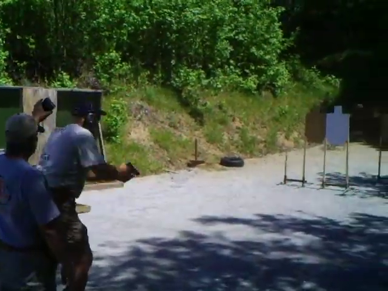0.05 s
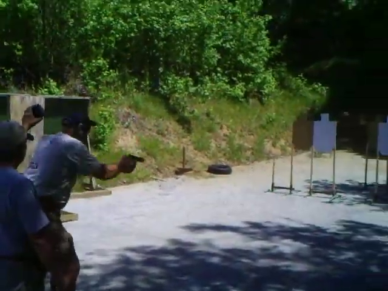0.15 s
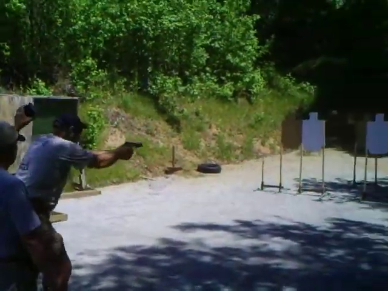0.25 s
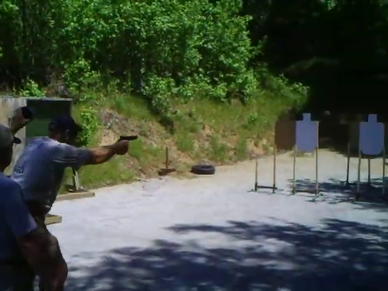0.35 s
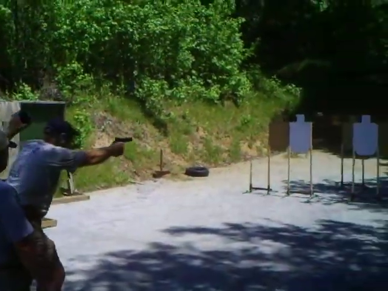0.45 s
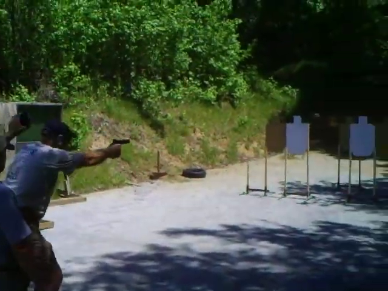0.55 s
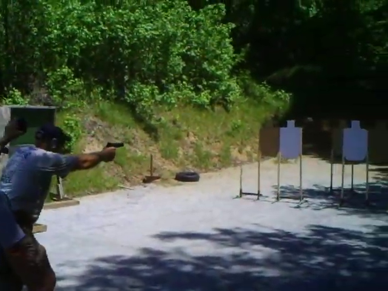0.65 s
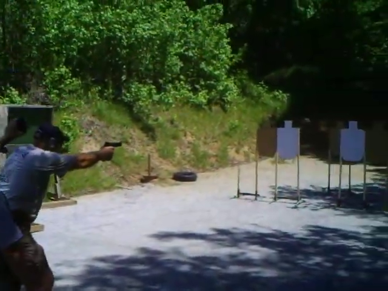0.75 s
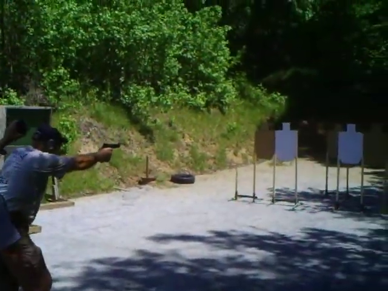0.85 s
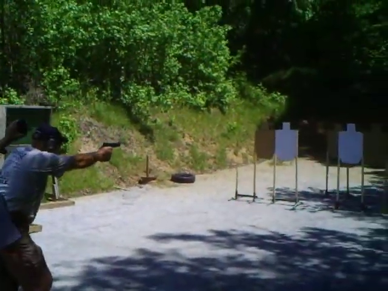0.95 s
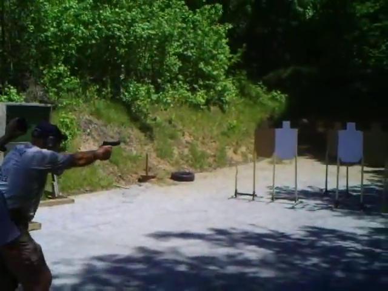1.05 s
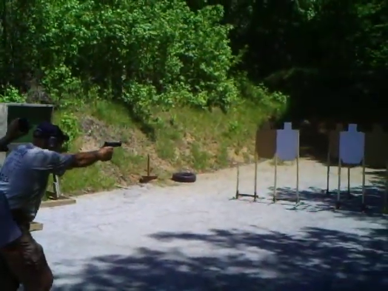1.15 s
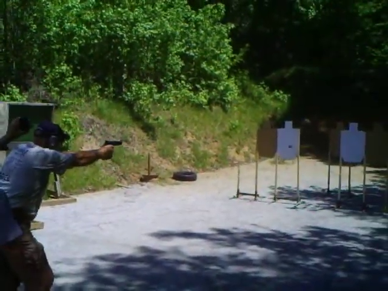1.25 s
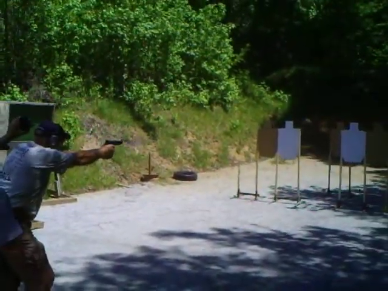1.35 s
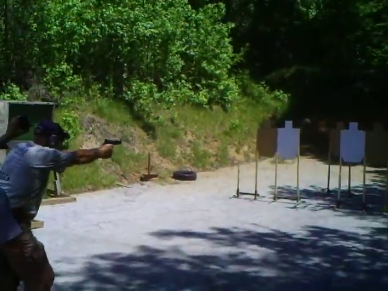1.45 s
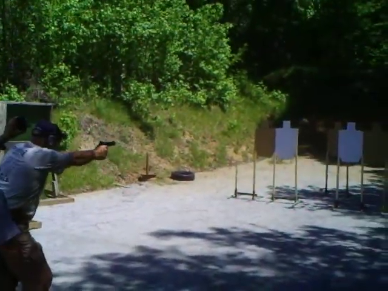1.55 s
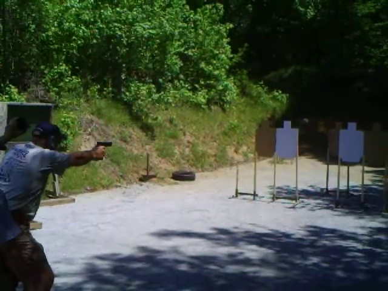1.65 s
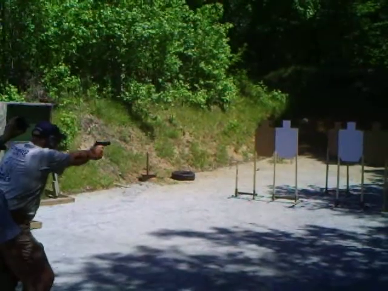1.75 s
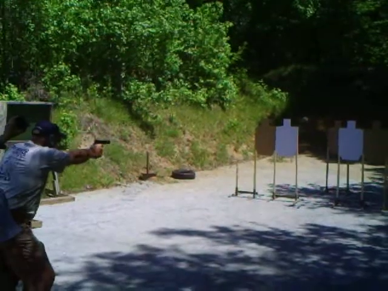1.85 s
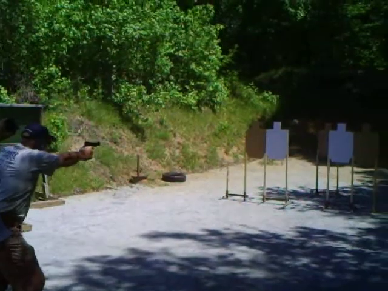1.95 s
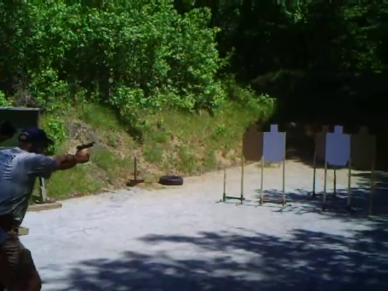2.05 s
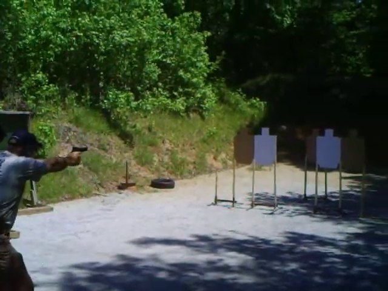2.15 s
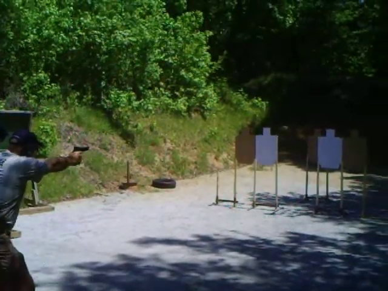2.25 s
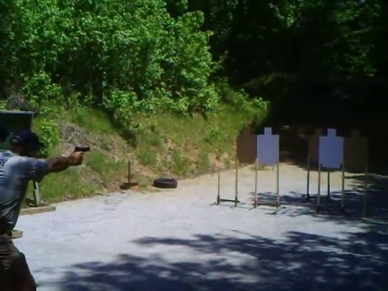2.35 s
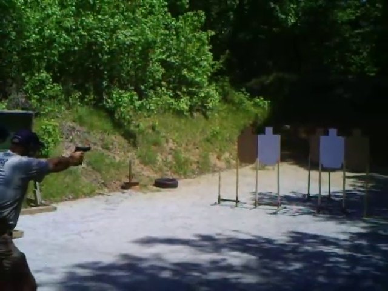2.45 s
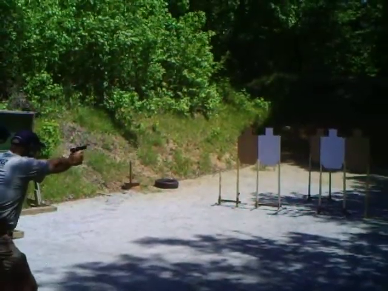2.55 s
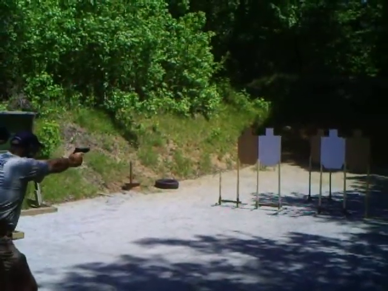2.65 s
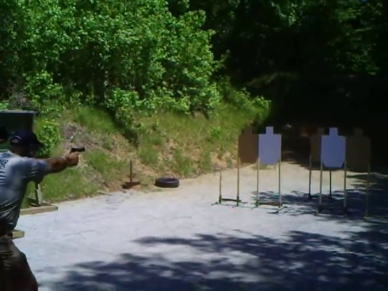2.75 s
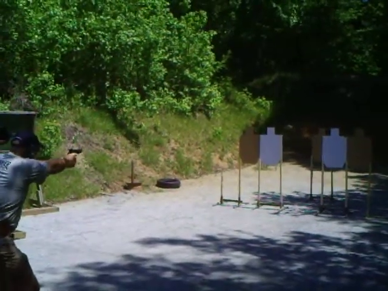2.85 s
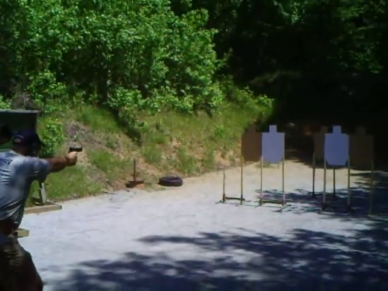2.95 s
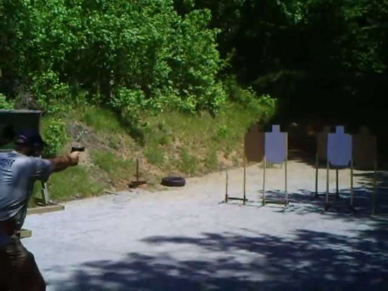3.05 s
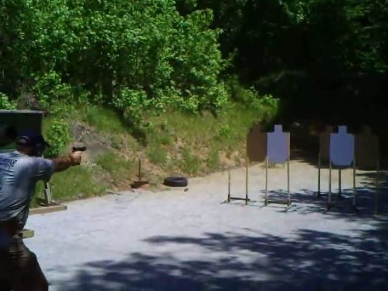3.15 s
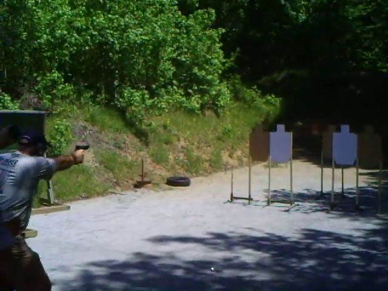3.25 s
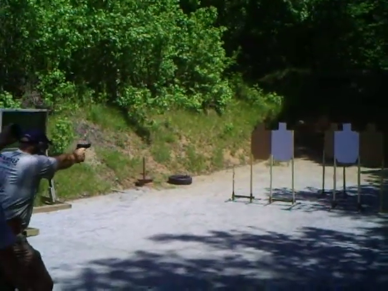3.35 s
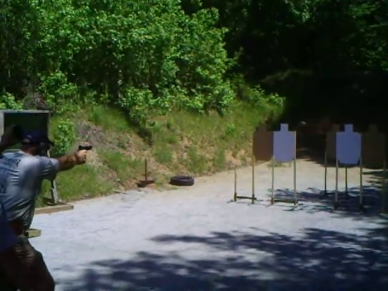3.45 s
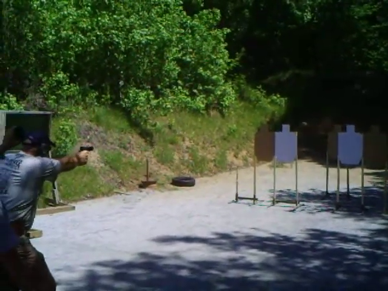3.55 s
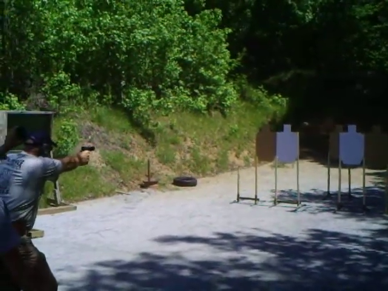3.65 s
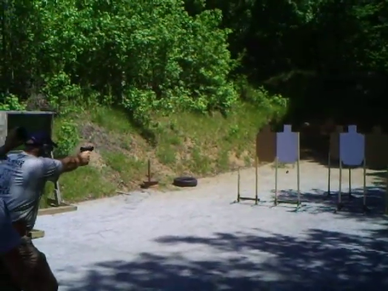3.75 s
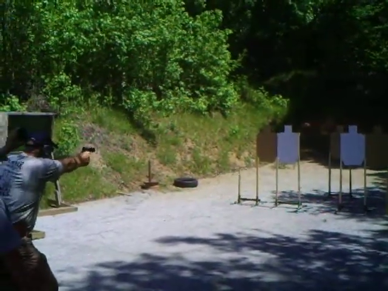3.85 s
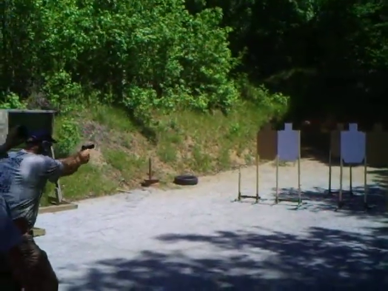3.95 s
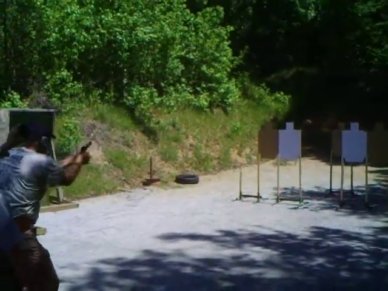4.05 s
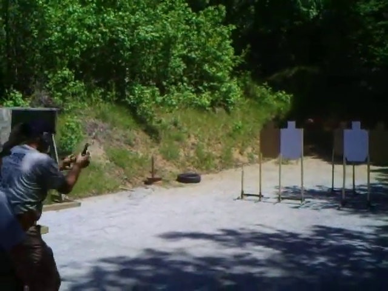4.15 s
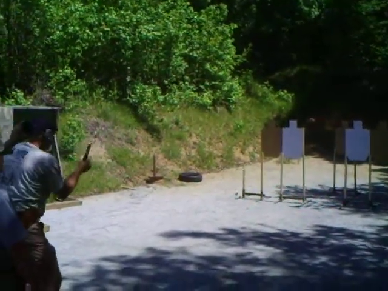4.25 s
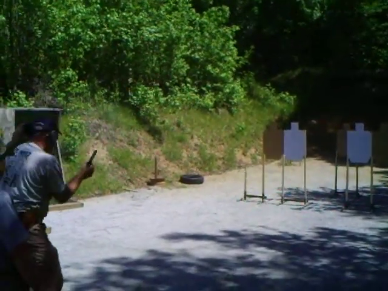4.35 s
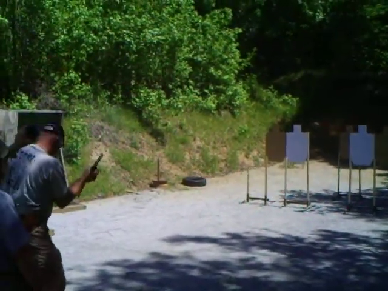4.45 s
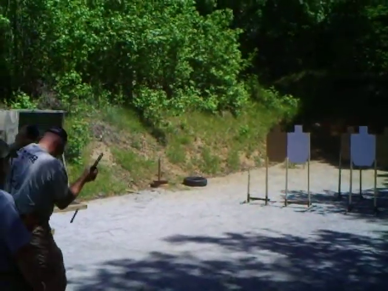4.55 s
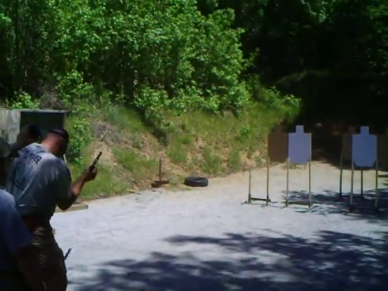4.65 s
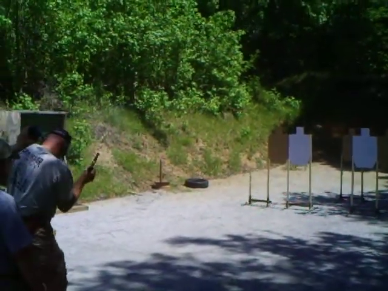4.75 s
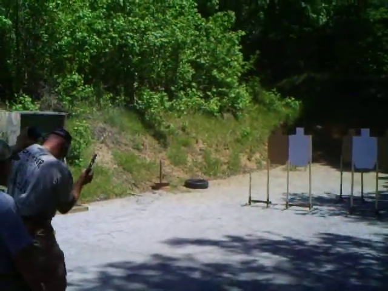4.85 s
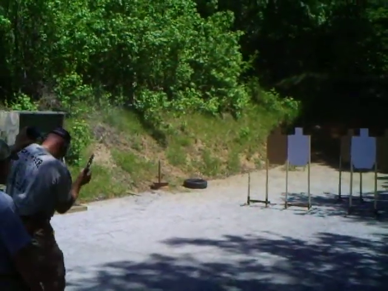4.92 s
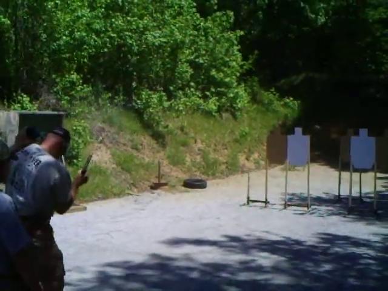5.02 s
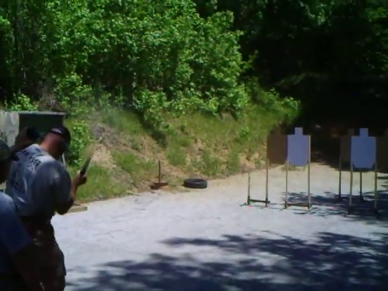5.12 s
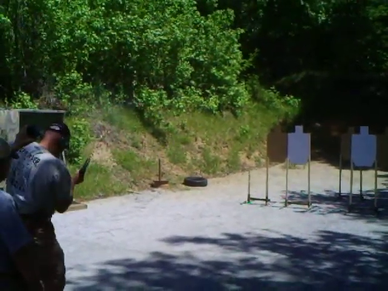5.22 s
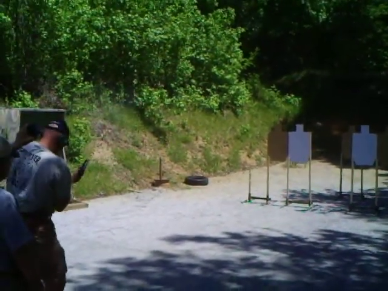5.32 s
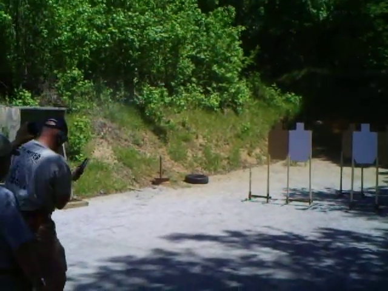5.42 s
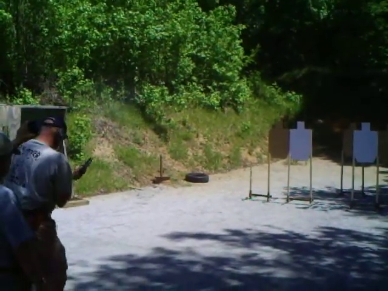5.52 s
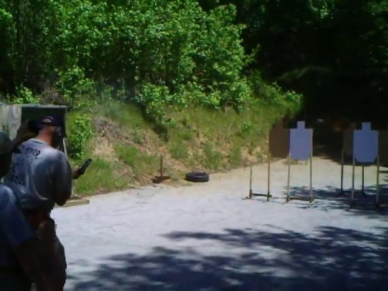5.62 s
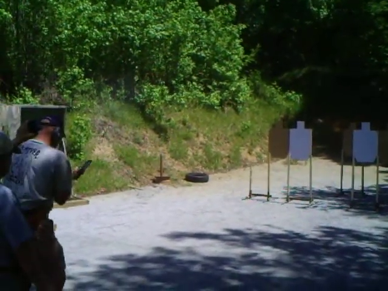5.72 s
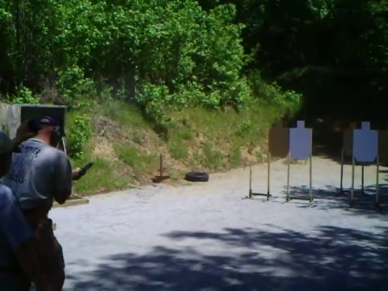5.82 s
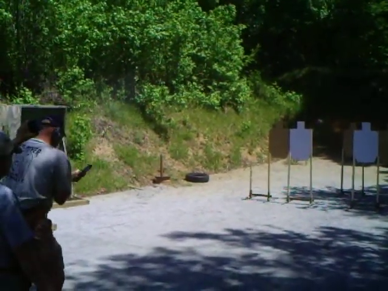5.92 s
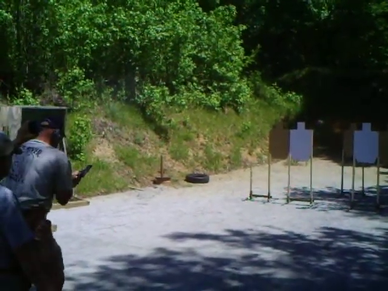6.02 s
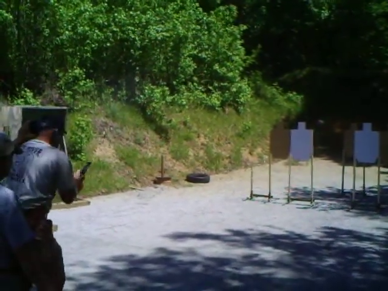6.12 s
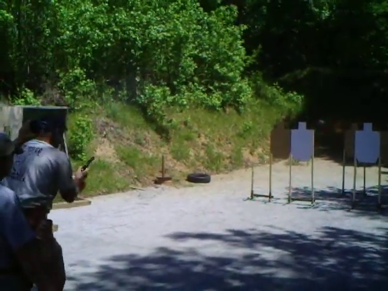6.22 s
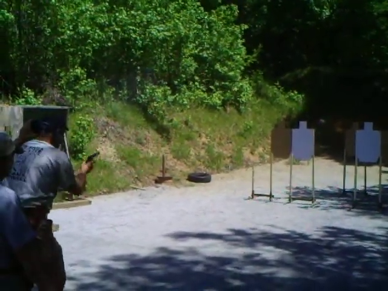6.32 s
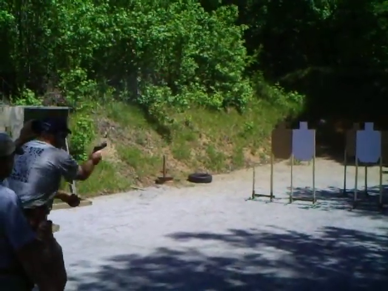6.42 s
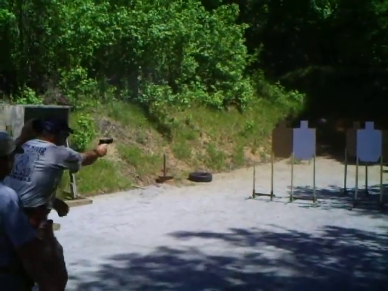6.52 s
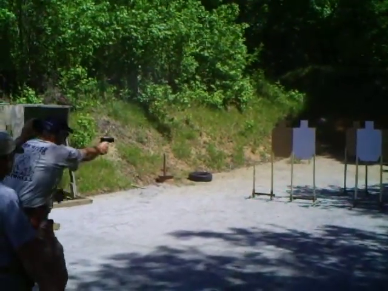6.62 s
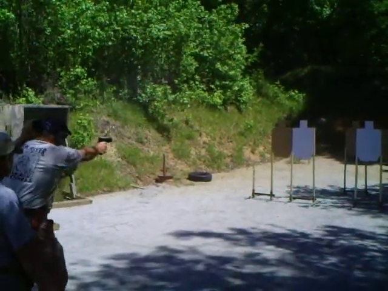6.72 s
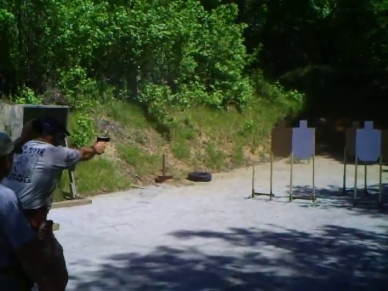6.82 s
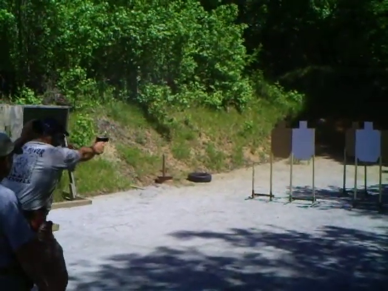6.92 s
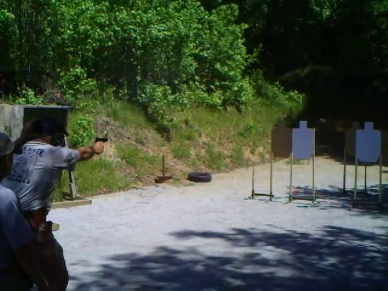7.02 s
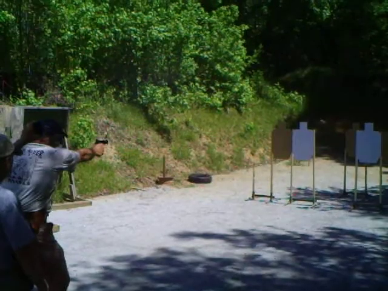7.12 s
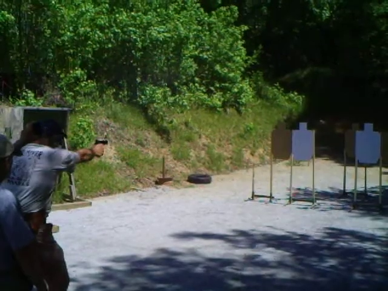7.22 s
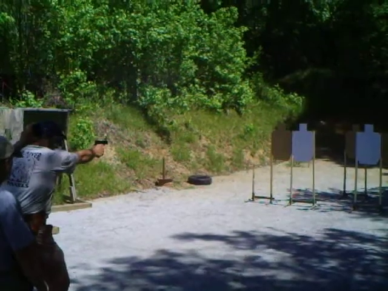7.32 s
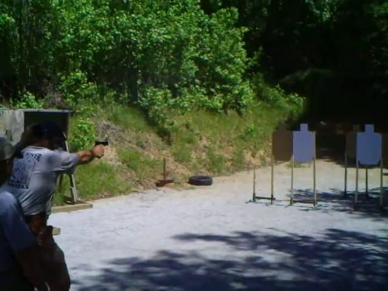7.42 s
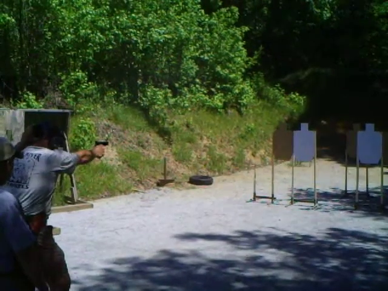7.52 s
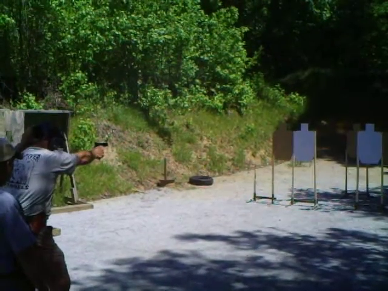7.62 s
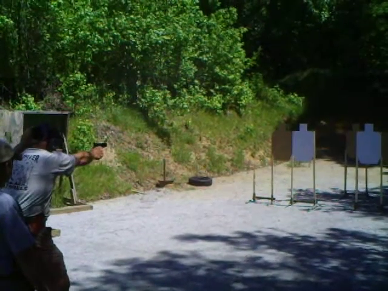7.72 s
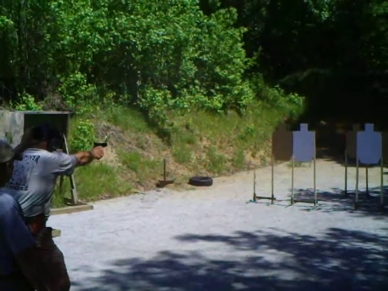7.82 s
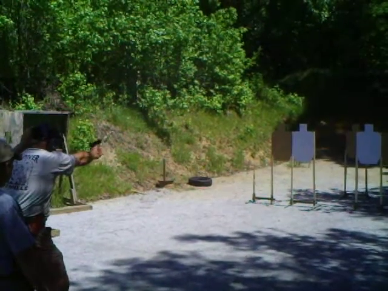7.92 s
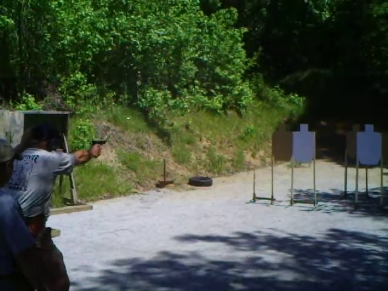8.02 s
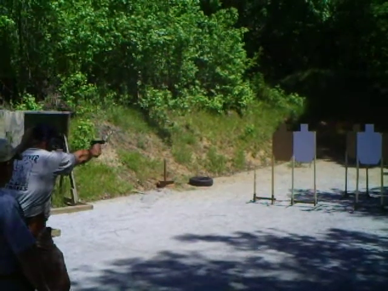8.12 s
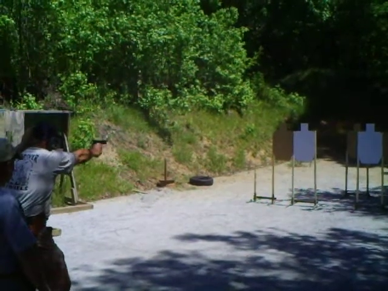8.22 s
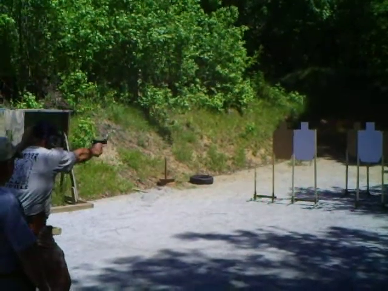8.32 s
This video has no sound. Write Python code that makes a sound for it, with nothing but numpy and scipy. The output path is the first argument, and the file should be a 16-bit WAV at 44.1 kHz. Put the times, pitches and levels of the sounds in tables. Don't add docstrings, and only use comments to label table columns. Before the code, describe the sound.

Over a very faint leafy hiss, with a faint insect whistle and barely audible quick pulsing from the camera, cloth settles and a pistol is drawn with tiny rattles in the first 0.4 seconds. Six shots follow at about 0.9, 1.4, 2.1, 2.6, 3.2 and 3.8 seconds. Each is a hard, clipped crack with a low thump, a slap from a shed some 40 milliseconds later, scattered earth-bank echoes and a long wash from trees and distant hills. Small digital ticks intrude around 3.4 and 3.55. The tail fades until metallic clicks and rustling cloth at 4.85 to 5.75 mark the reload, with another sharp click near 6.0. Sparse light rattles continue to about 7.45, and the insect faintly returns near 7.7. A seventh shot bursts at 7.95, its echo still ringing at the end. The small microphone, a few steps behind, overloads and sounds muffled, without high treble.

```python
import sys
import numpy as np
from scipy import signal
from scipy.fft import rfft, irfft, next_fast_len
from scipy.io import wavfile
from scipy.ndimage import uniform_filter1d

SR = 44100
rng = np.random.default_rng(int(sys.argv[2]) if len(sys.argv) > 2 else 0)


def to_linear_factor(level_db):
    exponent = np.asarray(level_db, float) / 20
    return 10 ** exponent


def bounce(signal):
    frames = np.transpose(np.atleast_2d(signal))
    limited = np.clip(frames, -1, 1)
    pcm = np.round(limited * 32767).astype(np.int16)
    wavfile.write(sys.argv[1], SR, pcm)


N = 369558

# frequency in Hz, level in dB.
AIR_COLOUR = [(100, -4), (386, -6.5), (600, -5), (950, -6.5), (2100, -9), (2800, -9.5), (3700, -10),
              (4300, -14)]
AIR_DB = -70
# start, loudest moment and end in seconds, rms level in dB.
RUSTLE = [
    (0, .18, .4, -60),
    (.555, .585, .635, -61),
    (.815, .84, .87, -58),
    (4.85, 4.9, 5.1, -52),
    (5.1, 5.29, 5.45, -55.5),
    (5.55, 5.7, 5.87, -54),
    (6.0, 6.08, 6.17, -60),
    (6.8, 6.93, 7.0, -70),
]
RUSTLE_EDGE_DB = -10
# start and end in seconds, frequency in Hz, level in dB.
CHIRPS = [
    (.03, .11, 2800, -75),
    (7.611, 7.78, 2800, -81.5),
]

# start and end in seconds, peak in dB.
FRAME_DEPTH = [
    (0, .47, -69),
    (.47, 3.79, -63.5),
    (3.79, 4.28, -71),
    (4.28, 7.59, -65.5),
    (7.59, 8.4, -74),
]
FRAME_HZ = 29.69

# time in seconds, rms of the first 7.5 ms in dB, ring in Hz, knock over the ring in dB.
DRAW = [(0.0774, -67.7, 3120, 1), (0.0914, -67.6, 2830, -2), (0.1154, -71.7, 3130, 11),
        (0.1356, -61.6, 3130, 4), (0.1474, -72.5, 2630, 6), (0.16, -56.5, 2690, 0),
        (0.1785, -53.1, 3300, -6), (0.2454, -69.0, 2250, 1), (0.2994, -72.1, 2180, 4),
        (0.3544, -89.8, 2480, 19), (0.6194, -69.1, 2290, -4), (0.7914, -83.6, 2620, 21),
        (0.8245, -63.6, 2840, -8), (0.8735, -58.3, 3160, -11)]
RELOAD = [(4.8543, -39.5, 2740, -19), (4.8624, -32.3, 2640, -27), (4.8718, -42.6, 2890, -27),
          (4.8784, -41.2, 2580, -28), (4.895, -55.0, 2540, -16), (4.9033, -45.7, 2850, -24),
          (4.918, -57.1, 2650, 0), (5.018, -59.4, 2600, -11), (5.0874, -36.5, 2960, -9),
          (5.1114, -52.8, 2820, -21), (5.1313, -58.8, 2560, -9), (5.1896, -52.2, 3590, -8),
          (5.1982, -49.5, 3530, -20), (5.248, -50.3, 2210, -10), (5.27, -63.9, 3360, -10),
          (5.457, -49.7, 3260, -30), (5.495, -60.6, 3220, -4), (5.538, -55.7, 3130, -24),
          (5.5447, -50.5, 3210, -18), (5.619, -50.4, 3250, -18), (5.6417, -56.9, 3200, -24),
          (5.659, -51.6, 3260, -27), (5.68, -52.4, 3730, -11), (5.696, -38.4, 2770, -14),
          (5.737, -55.4, 3330, -25)]
READY = [(5.8985, -62.2, 2000, -7), (6.0135, -41.9, 3240, -9), (6.0448, -58.3, 2650, -13),
         (6.054, -54.3, 3200, -12), (6.0914, -64.4, 2660, -10), (6.2777, -56.6, 3290, -24),
         (6.3074, -62.6, 3590, -22), (6.3214, -64.0, 2970, -28), (6.4077, -67.1, 2790, -6),
         (6.4274, -67.1, 3470, -22), (6.5394, -88.3, 1930, 22), (6.5744, -74.8, 2790, 8),
         (6.5827, -91.1, 1970, 28), (6.6238, -63.8, 3070, -24), (6.6463, -64.2, 3280, -27),
         (6.6563, -68.9, 2930, -5), (6.668, -65.8, 2370, -12), (6.7032, -64.3, 2990, -20),
         (6.7594, -72.6, 2850, -15), (6.8209, -54.0, 3480, -10), (6.8399, -56.6, 2850, -13),
         (6.8733, -60.7, 3410, -16), (6.891, -53.8, 3000, -14), (6.9067, -51.3, 2760, -33),
         (6.96, -70.6, 2770, -17), (7.2414, -79.6, 2230, 13), (7.4262, -52.2, 1950, 2),
         (7.4444, -68.6, 1870, 10), (7.838, -73.0, 2230, 4)]
# frequency in Hz, level in dB.
SCRAPE_COLOUR = [(1200, -20), (1900, 1.5), (3000, 2.5), (3800, 3.5), (4400, 5), (4800, -30)]
# frequency in Hz, level in dB.
KNOCK_COLOUR = [(450, -30.5), (720, -10), (950, -7), (1400, -5.5), (2200, -21.5)]
RING_WIDTH_HZ, RING_T60, KNOCK_T60 = 680, .032, .045
SCRAPE_DB, SCRAPE_SPEED = 4, 1.35
GRIP_HZ, GRIP_T60, GRIP_DB = 892, .08, -6
CLICK_RISE_S = .0008

# time in seconds, then levels in dB of low returns, near scatter, shed slap, bank scatter.
SHOTS = [
    (0.8962, -2, 3.5, 4, .3),
    (1.3932, -1, 1, 1, 0.5),
    (2.0891, -1.5, 4, 5, 2.8),
    (2.5837, -2.5, 2, 2, 1),
    (3.2132, -4.5, 2.5, 0, -0.5),
    (3.784, -4.5, 2, 1.5, 0.5),
    (7.9401, -3.5, 2, 2, -.3),
]
# delay in seconds, level in dB.
ECHOES = [(0.0035, 0), (0.0068, -5), (0.0215, -8), (0.0412, -3.5), (0.0521, -12), (0.0685, -10),
          (0.0774, -14), (0.0915, -14), (0.1265, -15), (0.1384, -14), (0.1538, -12), (0.188, -11.5)]
ECHO_HZ, ECHO_S = 770, .0017
# frequency in Hz, level in dB.
RETURN_COLOUR = [(60, -40), (200, -14), (350, 0), (5000, 0)]
TRUNKS_FROM_S, TRUNK_GAP_S, TRUNK_DB, TRUNK_LOSS_DB_S, TRUNK_SPREAD_DB = .08, .0118, -21.5, 30, 5
# frequency in Hz, level in dB.
NEAR_COLOUR = [(60, -28), (150, -18), (375, -4), (560, -8), (750, -7), (950, -11), (1400, -4), (2000, -11),
               (2500, -6.5), (3600, -11.5)]
BANK_COLOUR = [(60, -70), (120, -44), (160, -21), (240, -15), (380, -12), (600, -3), (790, -3.5),
               (1000, -3.5), (1800, -4.5), (2600, -2.5), (3600, -2.5)]
WOODS_COLOUR = [(80, -47), (215, -25), (265, -12.5), (350, -16.5), (630, -4.5), (960, -2), (1600, -3.5),
                (1900, -7), (2300, -1.5), (3100, -3), (3600, 1.5)]
HILLS_COLOUR = [(140, -35.5), (230, -17), (470, -2.5), (1060, -2), (2100, -14), (2700, -14.5), (3800, -13)]
# frequency in Hz, level in dB.
THUMP_COLOUR = [(20, -9.5), (40, -2), (110, -1), (170, -2), (300, -19.5)]
# frequency in Hz, T60 in seconds.
WOODS_T60 = [(100, 1.0), (200, 1.35), (700, 1.95), (1500, 1.65), (2500, 1.535), (3800, 1.065)]
HILLS_T60 = [(300, 3.1), (1000, 3.2), (3000, 2.4)]
WOODS_DB, HILLS_DB = -7, -33.5
# frequency in Hz, share from 0 to 1.
ALIKE = [(300, .95), (700, .92), (1100, .72), (2000, .6), (3200, .55)]
# peak delay in seconds, peak in dB, hold in seconds, sag while held and release in dB/s.
NEAR_SHAPE = (.0012, -4.5, .052, 265, 1200)
SLAP_SHAPE = (.0385, -7.5, .0037, 5, 7000)
FACE_SHAPE = (.0635, -5.5, .04, 140, 300)
SLOPE_SHAPE = (.07, -11, .12, 16, 300)
PUSH_SHAPE = (.004, -28, .03, 200, 500)
SHED_PUSH_SHAPE = (.041, -31, .055, 430, 240)
NEAR_RISE_DB_S, SLAP_RISE_DB_S, BANK_RISE_DB_S = 14000, 23000, 2400
PUSH_RISE_DB_S, SHED_PUSH_RISE_DB_S = 6000, 900
LUMP_DB, LUMP_S = 1.8, .004

# time in seconds, peak in dB.
SLAP_DIPS = [
    (.9365, -32),
    (1.4345, -29),
    (2.1288, -17),
    (2.624, -20),
    (7.9805, -34),
]
KICK_DB, KICK_S, KICK_LATE_S, REBOUND = -21, .0015, .0025, .8
# time in seconds, peak in dB.
GLITCH = [
    (3.4119, -12),
    (3.5478, -11),
]
# frequency in Hz, level in dB.
EDGE = [(20, 2), (3600, 2.5), (3850, 1), (4020, -7.5), (4300, -13), (4600, -46), (4800, -81.5),
        (5200, -110)]
FULL_SCALE, CEILING = 0.63, .71
TOPS_FROM_HZ = 130


def evened(x):
    return x / np.sqrt(np.mean(x ** 2) + 1e-20)


def read(points, hz):
    f, value = np.transpose(points)
    return np.interp(np.log(hz + 1), np.log(f + 1), value)


def add(mix, s, sound):
    part = mix[max(round(s * SR), 0):][:len(sound)]
    part += sound[:len(part)]


def coloured(x, colour):
    hz = np.fft.rfftfreq(len(x), 1 / SR)
    return irfft(rfft(x) * to_linear_factor(read(colour, hz)), len(x))


def air():
    t = np.arange(N) / SR
    hiss = evened(coloured(rng.standard_normal(N), AIR_COLOUR))
    grain = to_linear_factor(2.8 * evened(uniform_filter1d(rng.standard_normal(N), 300)))
    cloth_colour = [(400, -39.5), (1100, -18), (2000, -12.5), (3200, -1), (4200, -3.5)]
    cloth = evened(coloured(rng.standard_normal(N), cloth_colour) * grain)
    moves = np.zeros(N)
    for start, loudest, end, db in RUSTLE:
        course = np.interp(t, [start, loudest, end], [RUSTLE_EDGE_DB, 0, RUSTLE_EDGE_DB])
        moves += ((t > start) & (t < end)) * to_linear_factor(db + course)
    return to_linear_factor(AIR_DB) * hiss + uniform_filter1d(moves, size=900) * cloth


def insect():
    out = np.zeros(N)
    for start, end, hz, db in CHIRPS:
        band = [(hz - 450, -40), (hz, 0), (hz + 450, -40)]
        tone = evened(coloured(rng.standard_normal(8192), band))[:round((end - start) * SR)]
        add(out, start, to_linear_factor(db) * tone * signal.windows.tukey(len(tone), .4))
    return out


def frame_pulse():
    out, u = np.zeros(N), np.arange(-500, 500) / SR
    at = np.arange(300) / FRAME_HZ
    depth = sum(((at >= start) & (at < end)) * to_linear_factor(db) for start, end, db in FRAME_DEPTH)
    for s, deep, (late, load) in zip(at, depth, rng.random((len(at), 2))):
        size = deep * (.25 if load < .14 else .9 + .2 * load)
        add(out, s - .013 + .008 * late, -size * np.exp(-(u / .0035) ** 2))
    return out - uniform_filter1d(out, size=4000)


def handling():
    out, t, width = np.zeros(N), np.arange(4096) / SR, RING_WIDTH_HZ
    rise = 1 - np.exp(-(t / CLICK_RISE_S) ** 2)
    fall_db = -60 * t / RING_T60
    ring_fall = to_linear_factor(fall_db) + to_linear_factor(-23 - 60 * t / .2)
    scrape_fall = to_linear_factor(SCRAPE_DB + SCRAPE_SPEED * fall_db)
    grip = to_linear_factor(GRIP_DB - 60 * t / GRIP_T60) * np.sin(2 * np.pi * GRIP_HZ * t)
    head = slice(0, 330)
    for s, db, hz, knock_db in DRAW + RELOAD + READY:
        a, b, c = rng.standard_normal((3, len(t)))
        band = [(max(hz - 2 * width, 200), -40), (hz - width / 4, -3), (hz, 0),
                (hz + width / 4, -3), (hz + 2 * width, -40)]
        ring = evened(coloured(a, band)) * ring_fall
        scrape = evened(coloured(b, SCRAPE_COLOUR)) * scrape_fall
        bright = rise * (ring + scrape)
        knock = evened(coloured(c, KNOCK_COLOUR)) * to_linear_factor(-60 * t / KNOCK_T60)
        knock = rise * (knock + (s > 7.4) * grip)
        bright = bright / np.std(bright[head])
        knock = knock / np.std(knock[head])
        add(out, s - .0006, to_linear_factor(db - 1.5) * (bright + to_linear_factor(knock_db + 1.5) * knock))
    return out


def scatter(shared):
    alike = read(ALIKE, np.fft.rfftfreq(len(shared), 1 / SR))
    fresh = rng.standard_normal(len(shared))
    return irfft(alike * rfft(shared) + np.sqrt(1 - alike ** 2) * rfft(fresh), len(shared))


def lumps(size):
    wander = evened(uniform_filter1d(rng.standard_normal(size), round(LUMP_S * SR)))
    return evened(to_linear_factor(LUMP_DB * wander))


def swell(t, shape, rise_db_s):
    peak, db, hold, sag, release = shape
    late = t - peak
    climb = rise_db_s * np.minimum(late, 0)
    return to_linear_factor(db + climb - sag * np.clip(late, 0, hold) - release * np.maximum(late - hold, 0))


def dying(x, colour, t60):
    hz, t, z = signal.stft(evened(coloured(x, colour)), SR, nperseg=512)
    fall = to_linear_factor(-60 * t / read(t60, hz)[:, None])
    return signal.istft(z * fall, SR, nperseg=512)[1][:len(x)]


def returns(t):
    out = np.zeros(len(t))
    u = np.arange(-300, 300) / SR
    place, size = rng.random((30, 2)).T
    late = TRUNK_GAP_S * (np.arange(len(place)) + place)
    trunk_db = TRUNK_DB - TRUNK_LOSS_DB_S * late - TRUNK_SPREAD_DB * size
    surfaces = ECHOES + list(zip(TRUNKS_FROM_S + late, trunk_db))
    for (delay, db), (pitch, phase) in zip(surfaces, rng.random((len(surfaces), 2))):
        hz = ECHO_HZ * (.82 + .36 * pitch)
        ring = np.cos(2 * np.pi * (hz * u + phase)) * np.exp(-(u / ECHO_S) ** 2)
        add(out, delay - t[0] + u[0], to_linear_factor(db - 2.5) * ring)
    return coloured(out, RETURN_COLOUR)


def shots():
    lead = .01
    t = np.arange(1 << 17) / SR - lead
    short, out = t[:1 << 15], np.zeros(N)
    size = len(short)
    low = returns(short)
    near, slap, bank = rng.standard_normal((3, size))
    woods, hills = rng.standard_normal((2, len(t)))
    arrival = np.clip((t - .05) / 0.11, 0, 1)
    near_swell = swell(short, NEAR_SHAPE, NEAR_RISE_DB_S)
    slap_swell = swell(short, SLAP_SHAPE, SLAP_RISE_DB_S)
    bank_swell = np.hypot(swell(short, FACE_SHAPE, BANK_RISE_DB_S), swell(short, SLOPE_SHAPE, BANK_RISE_DB_S))
    push_swell = np.hypot(swell(short, PUSH_SHAPE, PUSH_RISE_DB_S),
                          swell(short, SHED_PUSH_SHAPE, SHED_PUSH_RISE_DB_S))
    for s, low_db, near_db, slap_db, bank_db in SHOTS:
        close = to_linear_factor(low_db) * low
        close += to_linear_factor(near_db) * near_swell * evened(coloured(lumps(size) * scatter(near), NEAR_COLOUR))
        close += to_linear_factor(slap_db) * slap_swell * evened(coloured(scatter(slap), NEAR_COLOUR))
        close += to_linear_factor(bank_db) * bank_swell * evened(coloured(lumps(size) * scatter(bank), BANK_COLOUR))
        close += push_swell * evened(coloured(rng.standard_normal(size), THUMP_COLOUR))
        far = to_linear_factor(WOODS_DB) * dying(scatter(woods), WOODS_COLOUR, WOODS_T60)
        far = far + to_linear_factor(HILLS_DB) * dying(scatter(hills), HILLS_COLOUR, HILLS_T60)
        add(out, s - lead, close)
        add(out, s - lead, arrival * far)
    return out


def overload_kicks():
    out, u = np.zeros(N), np.arange(-300, 600) / SR
    dip = np.exp(-(u / KICK_S) ** 2)
    back = np.exp(-((u - 2.4 * KICK_S) / (1.3 * KICK_S)) ** 2)
    for s, *_ in SHOTS:
        add(out, s + KICK_LATE_S + u[0], to_linear_factor(KICK_DB) * (REBOUND * back - dip))
    for s, db in SLAP_DIPS:
        add(out, s + u[0], to_linear_factor(db) * (.2 * back - dip))
    return out


def scene():
    return (air() + insect() + handling() + shots())[None]


def roll_off(x):
    return signal.sosfilt(signal.butter(12, 16200, fs=SR, output="sos"), x)


def record(dry):
    tops = dry[0] - np.clip(dry[0], -1.15 * FULL_SCALE, FULL_SCALE)
    tops_band = signal.butter(2, TOPS_FROM_HZ, "high", fs=SR, output="sos")
    x = dry[0] - signal.sosfiltfilt(tops_band, tops)
    x = signal.lfilter(*signal.butter(1, 22, "high", fs=SR), x)
    x = x + frame_pulse() + overload_kicks()
    keep = np.exp(-1 / (.7 * SR))
    power = uniform_filter1d(x ** 2, size=4000)
    x = x - .02 * signal.lfilter([1 - keep], [1, -keep], power)
    for s, db in GLITCH:
        add(x, s, to_linear_factor(db) * np.ones(6))
    padded = np.pad(x, (0, next_fast_len(N + SR) - N))
    x = np.clip(coloured(padded, EDGE)[:N], -CEILING, CEILING)
    return roll_off(x[None])


dry = scene()
out = record(dry)
bounce(out)
```